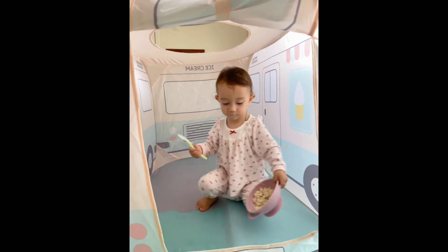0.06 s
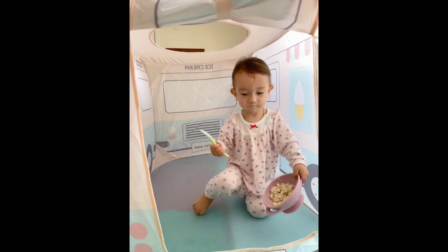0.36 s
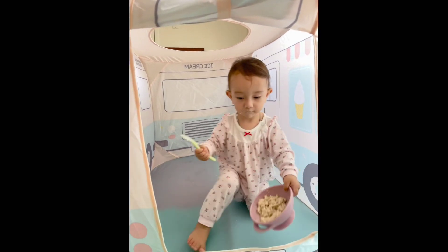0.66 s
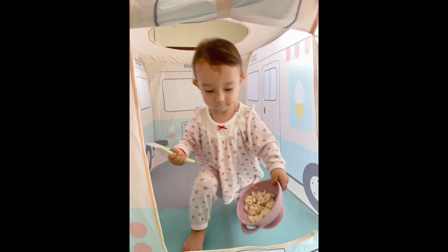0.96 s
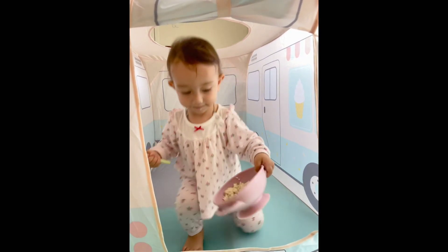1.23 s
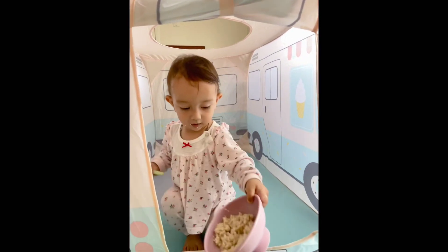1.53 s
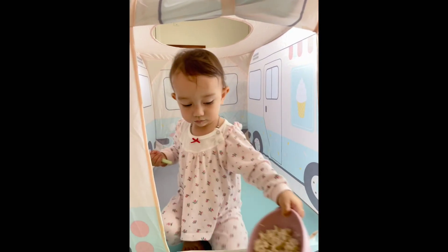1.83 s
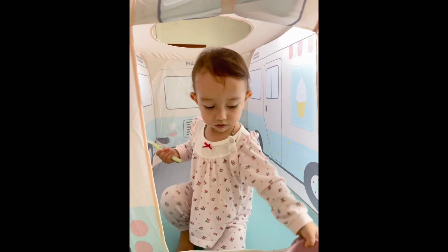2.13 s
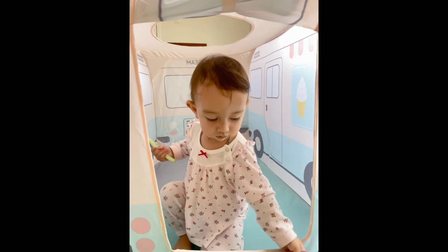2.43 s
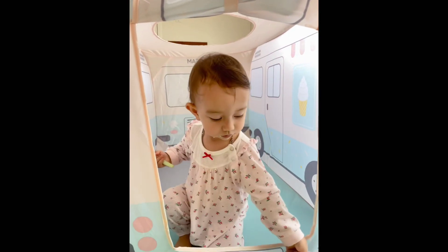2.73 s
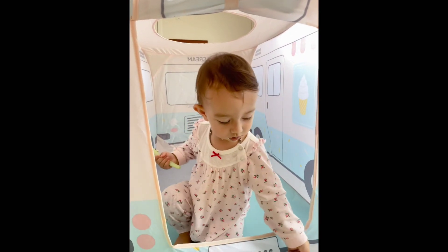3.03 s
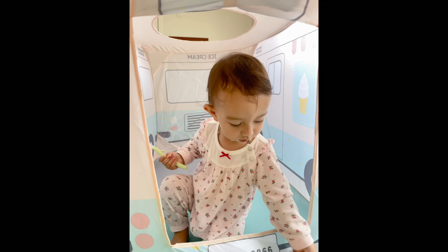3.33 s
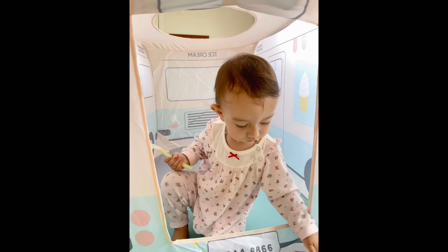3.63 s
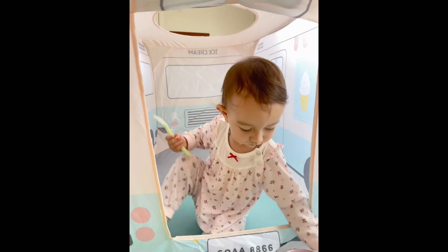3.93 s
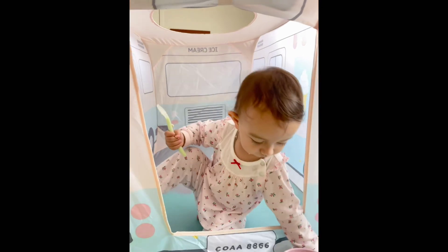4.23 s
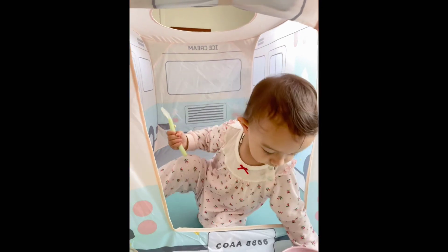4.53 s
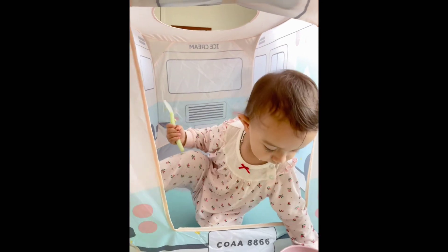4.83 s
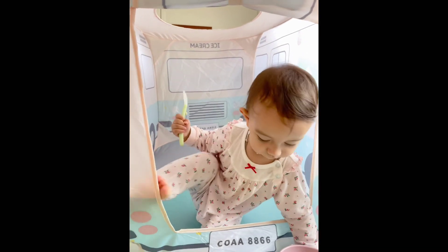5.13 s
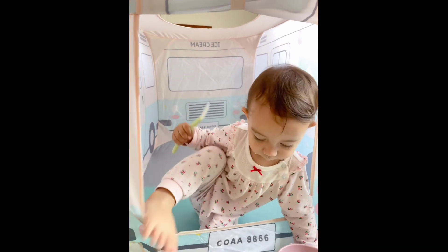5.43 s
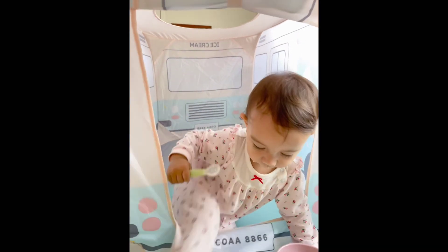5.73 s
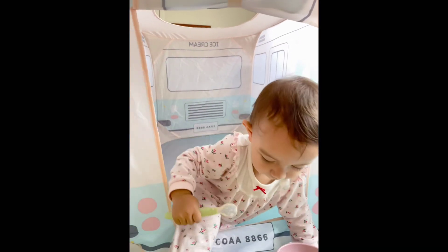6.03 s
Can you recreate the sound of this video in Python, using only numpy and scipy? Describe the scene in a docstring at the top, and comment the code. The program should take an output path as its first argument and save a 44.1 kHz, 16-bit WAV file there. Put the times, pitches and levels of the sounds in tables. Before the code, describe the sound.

A small child crawls through a play tent in a quiet room, the cloth rustling and snapping before a foot thumps down.

```python
"""Crawling through a play tent

A small child crawls across a pop-up tent in a quiet room, close to a mono microphone.
Knees and feet swish over the polyester, whose ribbed weave zips on the fast strokes.
Tight panels snap as they buckle. A foot drags over the door sill and lands on the floor
with one thump."""
import sys
import numpy as np
from scipy import signal
from scipy.fft import rfft, irfft, next_fast_len
from scipy.io import wavfile
from scipy.ndimage import uniform_filter1d, map_coordinates

SR = 44100
rng = np.random.default_rng(int(sys.argv[2]) if len(sys.argv) > 2 else 0)


def wrap_up_sound(samples):
    """Save the sound to the file named by the first command line argument, as 16-bit audio."""
    columns = np.atleast_2d(samples).T
    # keep every value between -1 and 1, then stretch to whole-number steps
    tamed = np.clip(columns, -1, 1)
    steps = np.round(tamed * 32767).astype(np.int16)
    wavfile.write(sys.argv[1], SR, steps)


N = 276948


def amp(db):
    """Turn decibels into a gain."""
    return 10 ** (np.asarray(db) / 20)


def unit(x):
    """Scale a signal to an average (rms) size of 1."""
    return x / np.sqrt(np.mean(x ** 2) + 1e-20)


def along(points, hz):
    """Read between (frequency, value) points on a log frequency axis."""
    freqs, values = np.transpose(points)
    return np.interp(np.log(hz + 1), np.log(freqs + 1), values)


def wobble(rate, size):
    """A smooth curve through `rate` random points a second."""
    points = rng.standard_normal(size // 8)
    return unit(map_coordinates(points, [np.arange(size) * rate / SR], mode="wrap"))


def filtered(x, response):
    """Scale each frequency of x by response(hz)."""
    size = next_fast_len(N + SR // 2)
    return irfft(rfft(x, size) * response(np.fft.rfftfreq(size, 1 / SR)), size)[:N]


def add(track, start_s, sound):
    """Mix a sound into the track."""
    part = track[round(start_s * SR):][:len(sound)]
    part += sound[:len(part)]


# Tone of the still room: f/Hz, level/dB
HUSH_TONE = [(18, -29), (30, -1), (144, -1), (187, -6.5), (532, -17), (970, -10.5), (1140, -33),
             (1260, -33), (2620, -21.5), (11300, -34), (15500, -45)]

def room_hush(level_db=-76):
    """The quiet room: a faint, steady noise, mostly low."""
    return amp(level_db) * unit(filtered(rng.standard_normal(N), lambda hz: amp(along(HUSH_TONE, hz))))


# How long the room rings: f/Hz, time to fade by 60 dB/s
ECHO_TIMES = [(100, 0.47), (1000, 0.18), (4000, 0.05), (12000, 0.097)]

def room_echo(sound):
    """The room answers briefly, each frequency dying away at its own speed."""
    hz, t, noise = signal.stft(rng.standard_normal(SR // 2), SR, nperseg=256)
    fade = amp(-60 * t / along(ECHO_TIMES, hz)[:, None])
    tail = signal.istft(noise * fade, SR, nperseg=256)[1]
    delayed = np.pad(sound, (SR // 250, 0))  # 4 ms
    return signal.fftconvolve(delayed, tail / np.linalg.norm(tail))[:N]


def friction(tone, slips_per_s, grain, patchy_db):
    """Countless tiny fibre slips plus some larger ones, coloured by shifting folds."""
    large_slips = (rng.random(N) < slips_per_s / SR) * rng.standard_normal(N)
    bands = signal.stft(rng.standard_normal(N) + grain * unit(large_slips), nperseg=512)[2]
    folds = uniform_filter1d(rng.standard_normal(bands.shape), size=5, axis=0)  # smooth over frequency
    folds = uniform_filter1d(folds, size=10, axis=1)  # and over time
    slipping = signal.istft(bands * amp(patchy_db * unit(folds)), nperseg=512)[1][:N]
    return unit(filtered(slipping, lambda hz: amp(along(tone, hz))))


# A limb slides over the cloth: t at full speed/s, rise/s, hold/s, fall/s, flutter/dB, rub/dB, hiss/dB
LIMB_STROKES = [ (0.092, 0.25, 0.042, .13, -64, -51.5, -55), (.22, 0.065, .04, .1, -82, -69, -63.5),
                (0.301, 0.049, 0.04, 0.13, -59, -55.5, -60.5),
                (0.386, 0.0033, .11, 0.15, -84.5, -80, -45.5), (0.412, 0.05, .015, .07, -71, -51.5, -48),
                (0.646, 0.031, 0.018, 0.079, -49, -58, -72), (0.686, 0.19, 0.018, 0.57, -67, -57, -60),
                (1.028, 0.015, 0.016, 0.37, -75, -67.5, -78),
                (1.182, 0.023, 0.043, 0.09, -61, -55.5, -46.5), (1.308, 0.17, 0.055, .1, -68, -59, -39.5),
                (1.353, 0.054, 0.022, 0.13, -58, -47.5, -57), (1.453, 0.081, 0.041, .1, -55, -53.5, -55.5),
                (1.705, 0.12, 0.023, .1, -64, -50, -51), (1.767, 0.083, 0.029, 0.072, -52.5, -45.5, -42.5),
                (1.977, 0.18, .1, .2, -56.5, -52.5, -53.5), (2.153, 0.074, .04, 0.11, -53, -51.5, -49),
                (2.285, 0.019, 0.08, 0.044, -55, -51.5, -52), (2.39, 0.067, 0.027, 0.83, -63, -62.5, -71),
                (2.48, 0.097, .08, .05, -72, -71, -72.5), (2.73, .02, 0.18, .1, -76, -88, -86),
                (3.036, 0.054, .03, 0.13, -83, -69.5, -74.5), (3.117, 0.028, 0.022, 0.24, -67, -61, -69),
                (3.273, 0.093, .17, 0.091, -65.5, -61.5, -55), (3.557, 0.16, 0.034, 0.34, -62, -57.5, -57),
                (3.721, 0.039, 0.022, 0.25, -65, -53.5, -60.5), (3.925, .12, 0.06, 0.16, -75, -62, -51.5),
                (4.068, 0.078, .01, 0.1, -56.5, -64, -73), (4.11, 0.087, 0.12, 0.16, -62, -59, -54.5),
                (4.287, 0.015, 0.021, 0.34, -57.5, -59.5, -57.5), (4.581, 0.023, .01, 0.079, -62, -58, -75),
                (4.638, .012, .04, 0.22, -58, -62, -78), (4.729, 0.033, 0.089, .2, -62.5, -68, -62),
                (4.917, 0.11, 0.036, 0.13, -61.5, -56, -59), (4.964, 0.033, 0.016, 0.13, -52.5, -56.5, -60),
                (5.075, 0.15, 0.026, 0.072, -58, -54.5, -54),
                (5.122, 0.024, 0.011, 0.025, -49.5, -50.5, -45.5),
                (5.15, .03, 0.051, 0.29, -59.5, -59.5, -52.5), (5.46, 0.11, 0.25, 0.17, -54, -56.5, -59.5),
                (5.609, 0.016, 0.0043, 0.027, -57, -44, -41.5), (5.622, 0.12, .02, 0.059, -42.5, -44, -54),
                (5.684, .03, .005, 0.069, -58, -65, -53), (5.741, 0.017, 0.047, 0.2, -49.5, -50, -49.5),
                (5.972, 0.14, 0.021, 0.67, -57.5, -58.5, -62.5), (6.262, .12, .03, .1, -70, -56, -59)]

def stroke_levels(range_db=25, rise_curve=1.81):
    """Each stroke speeds up, holds and dies away. Gives flutter, rub and hiss curves in dB."""
    t = np.arange(0, N, 32) / SR
    power = np.zeros((3, len(t)))  # overlapping strokes add in power
    for at_s, rise, hold, fall, *levels_db in LIMB_STROKES:
        rising = (np.maximum(at_s - t, 0) / rise) ** rise_curve
        fading = np.maximum(t - at_s - hold, 0) / fall
        power += np.outer(amp(levels_db), amp(-range_db * (rising + fading))) ** 2
    return [np.interp(np.arange(N) / SR, t, db) for db in 10 * np.log10(power + 1e-20)]


# Tones of shaking panels, rubbed cloth, and the weave in slow and fast strokes: f/Hz, level/dB
FLUTTER_TONE = [(30, -26), (55, -1.5), (80, 1), (140, 1.5), (300, -0.5), (500, -19), (1000, -44)]
RUB_TONE = [(150, -34), (330, -0.5), (600, 1.5), (1000, 0.5), (1700, -1), (2500, -5), (4000, -9.5),
            (8000, -21)]
HISS_TONE = [(700, -25), (1800, -1.5), (3000, -1.5), (3900, 1), (5000, -1), (9200, -2.5), (11700, -6),
             (12500, -16.5), (15500, -8)]
SIZZLE_TONE = [(2000, -16), (4000, -2), (7000, 0.5), (9200, 2), (10500, 1.5), (11800, 5.5), (13200, -4),
               (15500, -1)]

def cloth_swish():
    """Sliding cloth shakes the panels, rubs and hisses; faster sliding is brighter."""
    flutter_db, rub_db, hiss_db = stroke_levels()
    flutter = amp(flutter_db - 2.5) * friction(FLUTTER_TONE, slips_per_s=90, grain=0.49, patchy_db=4.5)
    rub = amp(rub_db) * friction(RUB_TONE, slips_per_s=260, grain=0.43, patchy_db=2.5)
    hiss = amp(-0.57) * friction(HISS_TONE, slips_per_s=730, grain=0.56, patchy_db=2.5)
    sizzle = amp(0.07) * friction(SIZZLE_TONE, slips_per_s=5200, grain=0.14, patchy_db=2.0)
    fast = np.clip((hiss_db + 58.5) / 15, 0, 1)  # a louder hiss stands for a faster stroke
    weave = np.sqrt(1 - fast) * hiss + np.sqrt(fast) * sizzle
    return flutter + rub + amp(hiss_db) * weave


# Fast strokes over the ribs, each timed at its hardest press:
# t/s, time before/s, time after/s, start f/Hz, pressed f/Hz, end f/Hz, level/dB, pitch blur (0-1)
WEAVE_ZIPS = [ (.428, 0.03, 0.026, 400, 290, 280, -48, 0.07),
              (.445, 0.032, .03, 2750, 2370, 2190, -56.5, 0),
              (.48, 0.061, 0.045, 3540, 4420, 4420, -45, .02),
              (0.517, 0.017, 0.096, 3750, 3207, 1484, -54, 0.17),
              (1.19, 0.037, 0.03, 1190, 1755, 2100, -54, 0.1),
              (1.265, .045, 0.046, 2150, 2335, 2560, -43.5, 0.03),
              (1.299, 0.023, 0.052, 2883, 2990, 2770, -42, .07),
              (1.72, .04, 0.052, 840, 1017, 1213, -50.5, 0),
              (3.422, 0.23, 0.036, 3225, 3330, 3240, -55.5, 0.19),
              (3.719, 0.038, 0.053, 4200, 4940, 4460, -50, 0.17),
              (4.97, 0.029, 0.081, 338, 411, 825, -56, 0.17),
              (5.083, 0.054, .04, 1410, 1610, 1420, -51, 0.03),
              (5.083, 0.055, .04, 3060, 3260, 3050, -51, 0.03),
              (5.181, 0.031, 0.022, 686, 1060, 1310, -55, .12),
              (5.57, 0.028, 0.039, 1414, 1640, 1800, -45.5, 0.07),
              (5.602, .02, 0.017, 1990, 3130, 3880, -38, 0.1)]

def weave_zips(overtone_db=-11, flicker_db=2.5, fade_s=0.014, edge_drop_db=11.5, edge_blur=0.05):
    """Threads tick past at a rate set by the sliding speed; an uneven pull blurs the pitch."""
    out, t = np.zeros(N), np.arange(SR // 3) / SR
    for at_s, before, after, start_hz, pressed_hz, end_hz, db, blur in WEAVE_ZIPS:
        times = [0, before, before + after]
        thread_hz = np.interp(t, times, [start_hz, pressed_hz, end_hz])
        edge = np.interp(t, times, [1, 0, 1])  # the light touch at each end is softer and less even
        pull = (blur + edge_blur * edge) * wobble(0.5 * pressed_hz, len(t))
        phase = 2 * np.pi * np.cumsum(thread_hz * (1 + pull)) / SR
        ticks = np.sin(phase) + amp(overtone_db) * np.sin(2 * phase)
        ticks *= amp(flicker_db * wobble(617, len(t)))
        contact = np.clip(np.minimum(t, before + after - t) / fade_s, 0, 1)
        add(out, at_s - before, contact * amp(db - edge_drop_db * edge) * unit(ticks))
    return out


def panel_pulse(size, hz, octaves, lag_s=0.0046):
    """A click crosses a panel, its low notes arriving last; lag_s is the delay at 500 Hz."""
    freqs = np.fft.rfftfreq(size, 1 / SR) + 1
    travel = np.exp(-4j * np.pi * lag_s * np.sqrt(freqs * 500))
    away = np.log2(freqs / hz) / octaves
    band = np.where(away > 0, np.exp(-away ** 2 / 2), 1 / (1 + away ** 2 / 2))  # steeper above hz
    wave = irfft(travel * band, size)
    return wave / np.abs(wave).max()


# Buckling panels, plus one bright seam tick at 3.191 s (the 12000 Hz row), with levels before the offsets
# below: t/s, level/dB, f/Hz, flap/dB, tick/dB
PANEL_SNAPS = [(.42, -36, 690, -30, -25), (.634, -36.5, 755, -6, -18), (0.851, -38, 1730, -10, -7),
               (1.028, -54.5, 1070, -9, -3), (1.966, -34.5, 770, 1, -20), (2.027, -39, 423, -10, -17),
               (2.198, -38, 570, -18, -6), (2.259, -40, 3320, -26, -23), (2.337, -30, 1100, -16, -8.5),
               (2.351, -41, 900, -19, -8), (2.508, -48, 690, -22, -15), (2.811, -38, 1010, -20, -17),
               (2.898, -53, 1760, -29, -24), (3.114, -41, 607, -5, -8), (3.189, -36.5, 2700, -6, -8),
               (3.191, -43, 12000, -27, -18), (3.204, -39.5, 1180, -2, -8), (3.311, -35, 1000, 3.5, 0.5),
               (3.369, -31, 1040, -5, 1.5), (3.442, -31, 3300, 2, 6.5), (3.473, -47.5, 865, -20, -21),
               (3.689, -42, 630, -18, -15), (4.284, -39, 1030, -7, -20), (4.302, -37.5, 1440, -2.5, -13),
               (4.579, -45, 1220, -4, -5), (4.635, -43.5, 800, -13, -5), (4.707, -46, 2230, -17, -2),
               (4.84, -39, 950, -36, -10), (5.5, -34, 897, -27, 6), (5.617, -26.5, 800, -28, -5.5),
               (5.932, -46, 810, -10, -8), (6.177, -37, 574, -29, -33)]

def panel_snaps(crack_db=-19, shiver_db=-9, shiver_s=0.0039):
    """A tight panel flips with a pop, a low flap and a crisp tick, then trembles for a moment."""
    out, t = np.zeros(N), np.arange(SR // 20) / SR
    size = len(t)
    for at_s, db, hz, flap_db, tick_db in PANEL_SNAPS:
        crack = amp(crack_db) * np.exp(-t / 0.0075) * rng.standard_normal(size)
        tick = amp(tick_db + 6.5) * (panel_pulse(size, hz=2650, octaves=0.42) + crack)
        flap = amp(flap_db - 2.5) * panel_pulse(size, hz=330, octaves=0.54)
        flip = panel_pulse(size, hz, octaves=0.33) + flap + tick
        flip /= np.abs(flip).max()
        shiver = np.exp(-t / shiver_s) * rng.standard_normal(size)
        tremble = signal.fftconvolve(flip, shiver / np.linalg.norm(shiver))[:size]
        add(out, at_s, amp(db - 1) * (flip + amp(shiver_db) * tremble))
    return out


def bending_wave(t, start_hz, end_hz, fall_s):
    """A ripple whose high notes arrive first, so the pitch drops."""
    hz = end_hz + (start_hz - end_hz) / (1 + t / fall_s) ** 2
    return np.sin(2 * np.pi * np.cumsum(hz) / SR)


def ring(t, notes):
    """A struck object rings at its own fading notes, in a slightly new balance each time."""
    return sum(amp(db + rng.normal(0, 1) - 60 * t / fade_s) * np.sin(2 * np.pi * hz * t)
               for hz, db, fade_s in notes)


# Ringing notes of the tent's hoop and of the floor: f/Hz, level/dB, time to fade by 60 dB/s
HOOP_NOTES = [(511, -9, 0.098), (631, 5, 0.088), (718, 1.5, 0.11), (864, -14, 0.086), (1096, -3, 0.15),
              (1187, -1, 0.12), (1255, 4.5, 0.065), (1320, -6, .09), (2380, -10, 0.062)]
FLOOR_NOTES = [(56.8, -4.5, 0.45), (101.6, 5.5, 0.13), (209, -8, 0.1), (284, -22, 0.15), (365, -15, 0.15)]
# The foot hits the sheet: t/s, level/dB, f that the pitch falls through/Hz, decay/s, crack/dB
FOOT_SLAPS = [(5.7342, -32.5, 1640, 0.0023, 7), (5.7362, -22, 1120, 0.014, -14),
              (5.741, -19, 1840, 0.0021, -1), (5.768, -16, 1060, 0.0035, -12.5)]
# Weight lands on the floor: t/s, level/dB
FLOOR_BUMPS = [(0.648, -59.5), (2.207, -55), (2.391, -56), (5.13, -51), (5.627, -49), (5.753, -20),
               (5.791, -34), (5.836, -37.5), (5.933, -48.5), (6.0, -53)]

def foot_thump(hoop_db=-23, heel_s=5.741, heel_db=-14):
    """The foot slaps the sheet, jars the hoop and sinks into the mat; weight makes the floor boom."""
    out, t = np.zeros(N), np.arange(2 * SR // 3) / SR
    for at_s, db, hz, decay_s, crack_db in FOOT_SLAPS:
        crack = amp(crack_db) * unit(signal.lfilter([1], [1, -0.84], rng.standard_normal(len(t))))
        ripple = 0.59 * bending_wave(t, start_hz=1.44 * hz, end_hz=0.42 * hz, fall_s=0.00697)
        slap = (1 - np.exp(-t / 0.00039)) * np.exp(-t / decay_s) * (crack + ripple)
        add(out, at_s, amp(db) * (slap + amp(hoop_db) * ring(t, HOOP_NOTES)))
    heel_push = amp(heel_db) * (1 - np.exp(-t / 0.01)) * np.exp(-t / 0.022)
    add(out, heel_s, heel_push * bending_wave(t, start_hz=398.2, end_hz=55.5, fall_s=0.01624))
    for at_s, db in FLOOR_BUMPS:
        add(out, at_s, amp(db) * (1 - np.exp(-t / 0.003)) * ring(t, FLOOR_NOTES))
    return out


def scene():
    """Cloth and footfall over the hush of the room, alike in both channels."""
    cloth = cloth_swish() + weave_zips()
    snaps, thump, hush = panel_snaps(), foot_thump(), room_hush()
    echo = room_echo(amp(-17.5) * cloth + amp(-9.5) * snaps + amp(-14.5) * thump)
    mono = hush + echo + cloth + snaps + thump
    return np.array([mono, mono])


def record(dry, bass_hz=52, top_hz=15800):
    """The microphone loses the deep bass and keeps nothing above top_hz."""
    thinned = signal.sosfilt(signal.butter(4, bass_hz, "high", fs=SR, output="sos"), dry)
    return np.array([filtered(side, lambda hz: hz < top_hz) for side in thinned])


dry = scene()
out = record(dry)
wrap_up_sound(out)
```